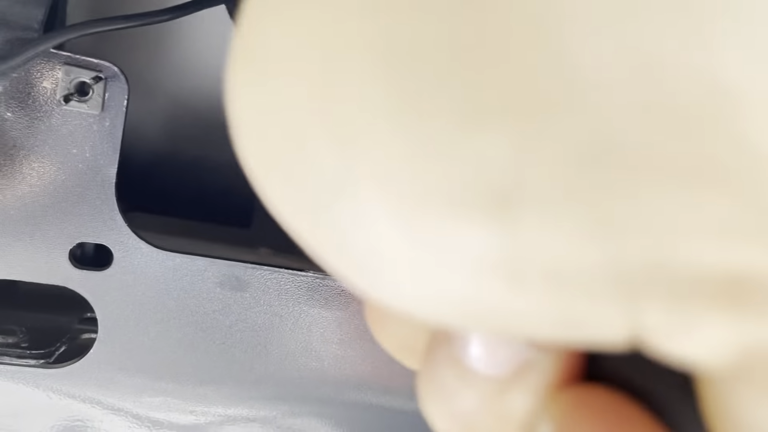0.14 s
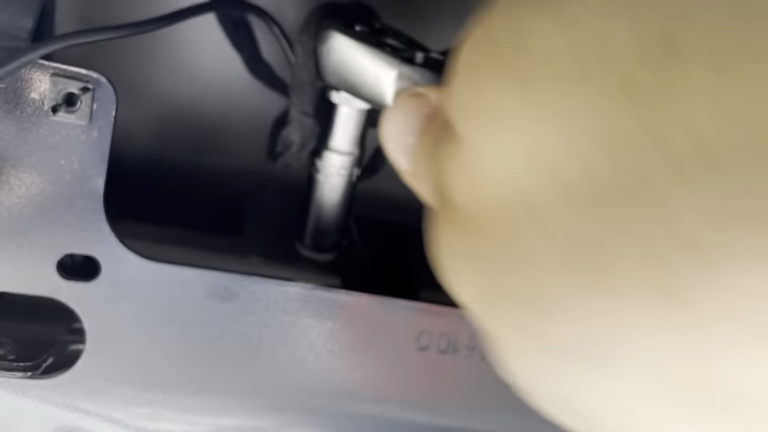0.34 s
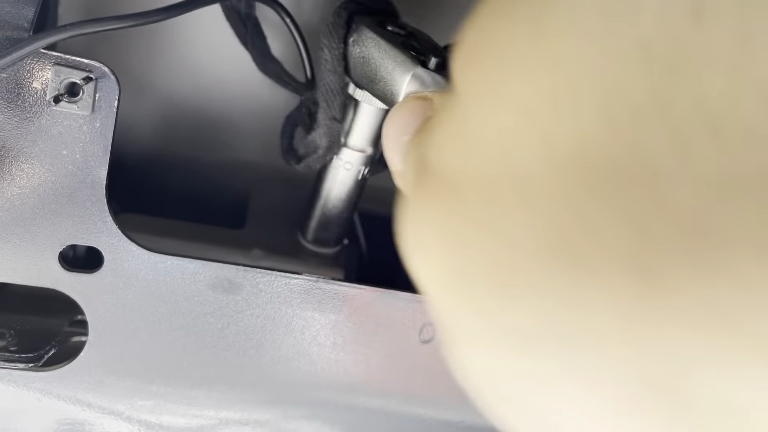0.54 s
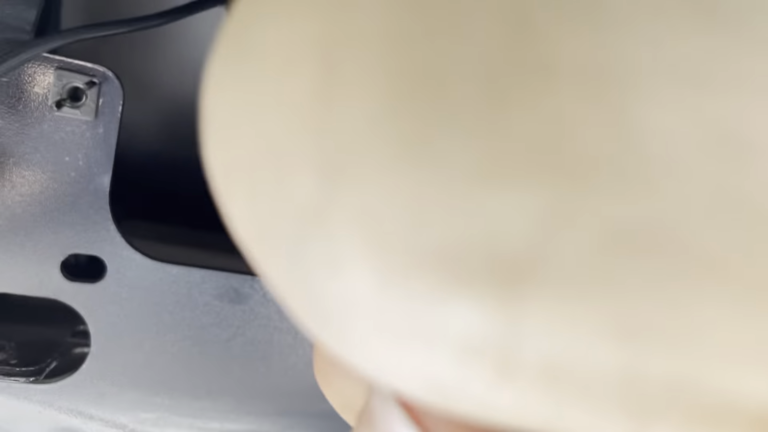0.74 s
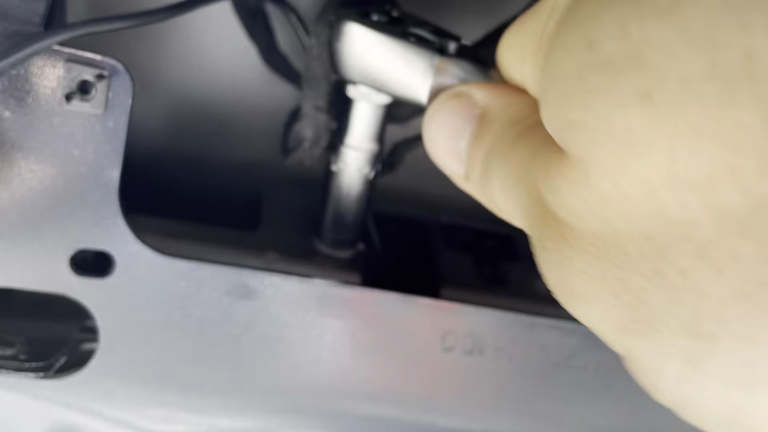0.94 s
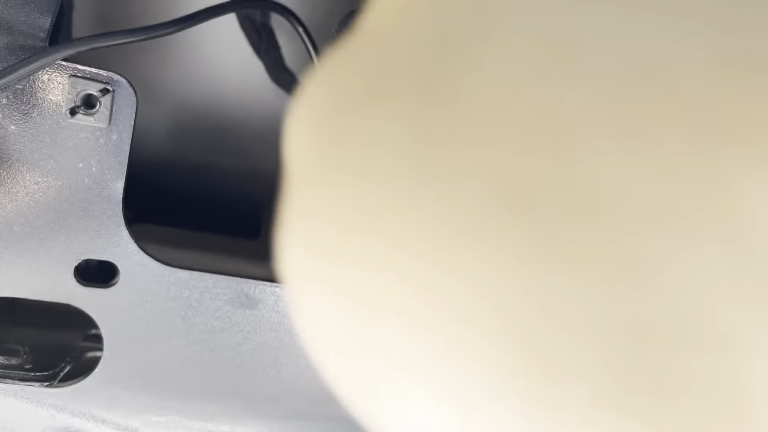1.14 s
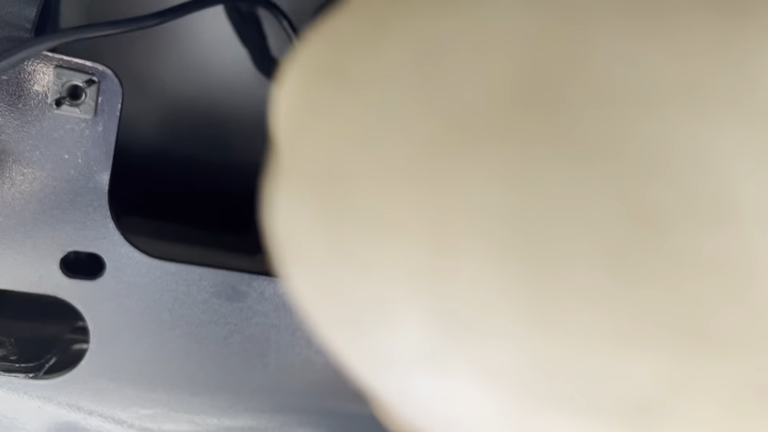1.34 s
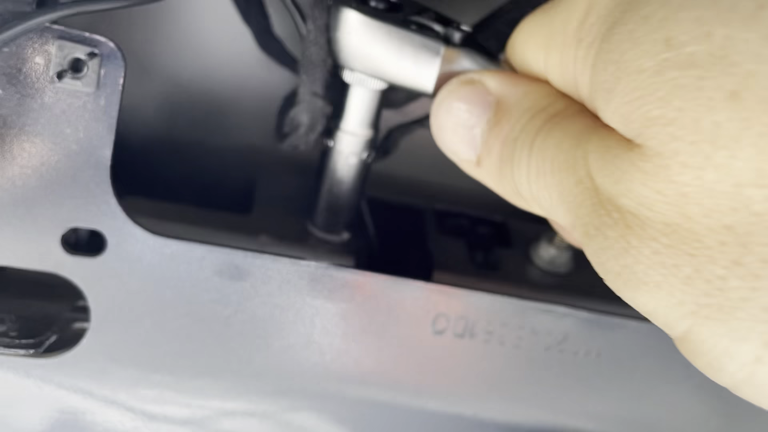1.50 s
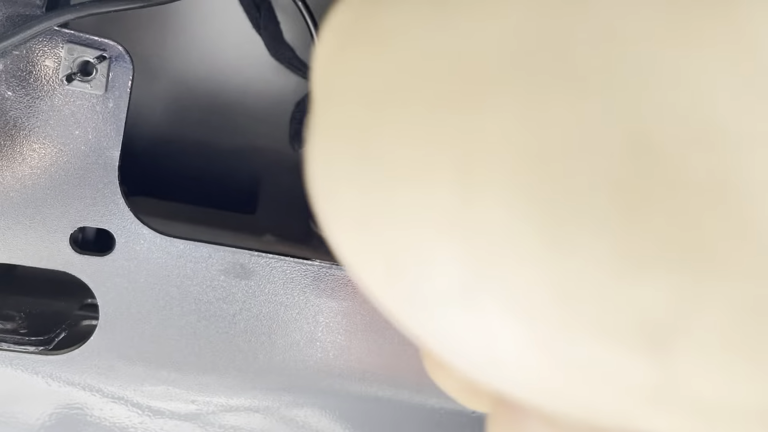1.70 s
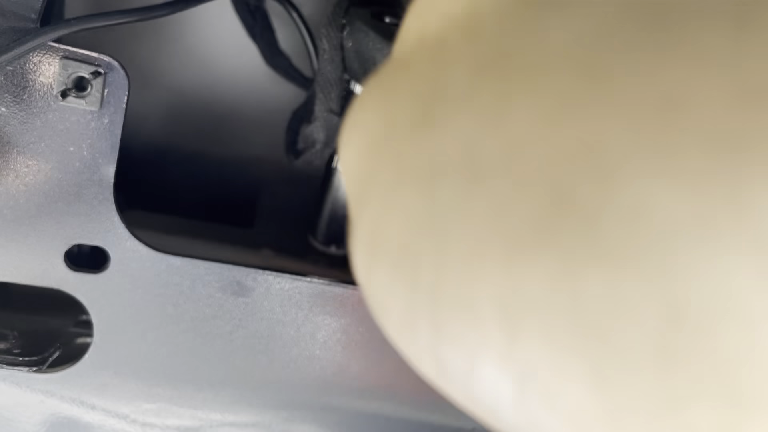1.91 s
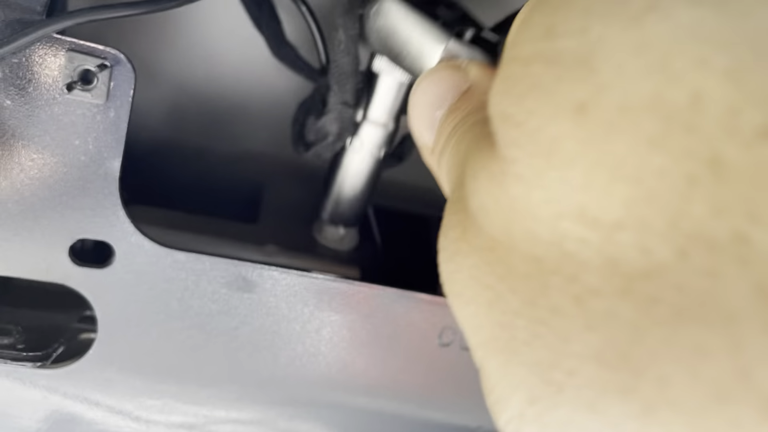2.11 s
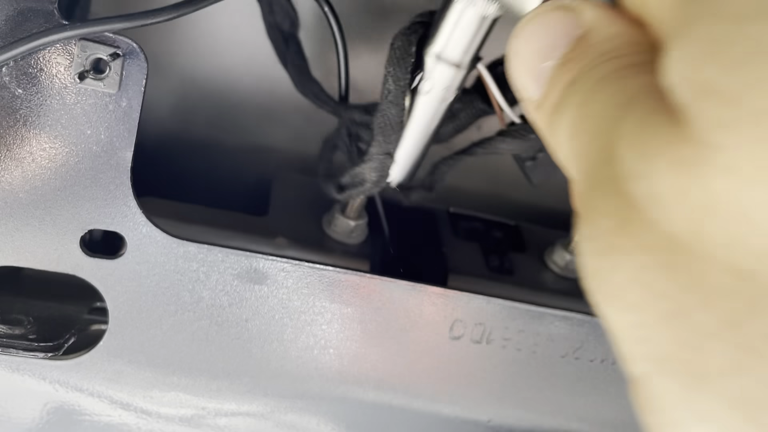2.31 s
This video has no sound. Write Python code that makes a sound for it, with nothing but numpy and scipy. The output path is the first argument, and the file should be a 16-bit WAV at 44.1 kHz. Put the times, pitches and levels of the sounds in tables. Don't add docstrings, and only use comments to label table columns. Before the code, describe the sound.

A ratchet wrench swings repeatedly, each stroke a dull hollow panel knock followed by a few fast steel clicks; lastly the socket scrapes off and clangs. Close stereo microphone, short door-cavity echoes, quiet garage.

```python
import sys
import numpy as np
from scipy import signal
from scipy.fft import rfft, irfft, next_fast_len
from scipy.io import wavfile
from scipy.ndimage import uniform_filter1d, map_coordinates

SR = 44100
rng = np.random.default_rng(int(sys.argv[2]) if len(sys.argv) > 2 else 0)


def to_wav(s):
    ch = np.atleast_2d(s).T
    pcm = np.round(np.clip(ch, -1, 1) * 32767)
    wavfile.write(sys.argv[1], SR, pcm.astype(np.int16))


def undo_db(level):
    steps = np.asarray(level, float) / 20
    return 10 ** steps


N = 103635

# [t/s, head chatter peak level/dB, steel ring level/dB]
PAWL_TEETH = [(0.2554, -16.5, -25), (0.269, -14.5, -24.5), (0.2843, -15, -24.5), (0.3007, -15, -25.5),
              (0.323, -25.5, -31.5), (0.3571, -24.5, -28.5), (0.7947, -21.5, -30.5), (0.8123, -22.5, -22.5),
              (0.8323, -25, -22.5), (0.8567, -23.5, -25.5), (0.8888, -29, -27), (1.3331, -20, -31),
              (1.3468, -30.5, -24), (1.3598, -24, -30.5), (1.3774, -25, -24), (1.4025, -26, -28),
              (1.4331, -24, -30), (1.9894, -27, -34.5)]
# [t/s, peak level/dB, share of the deep modes/dB, rattle level/dB]
PANEL_BLOWS = [(0.198, -18.5, -3.5, -31), (0.21, -10.5, -9, -28.5), (0.232, -22, -12, -41),
               (0.415, -21, -1, -37), (0.434, -16.5, 3.5, -27), (0.451, -16.5, -7, -68),
               (0.489, -32.5, 9.5, -65), (0.52, -23, 5, -41.5), (0.538, -25.5, 8, -55),
               (0.58, -30.5, -5, -56), (0.615, -35.5, 3, -67), (0.66, -40, 7, -68), (0.734, -3.5, -6, -22),
               (0.741, -12.5, -10.5, -52), (0.765, -17, -0.5, -43), (0.976, -26, 3, -42),
               (0.985, -31.5, 9.5, -37), (1.007, -13, -2.5, -37.5), (1.049, -32, 12, -47),
               (1.256, -18, 1, -38.5), (1.291, -9.5, -9, -44), (1.281, -6.5, -0.5, -26),
               (1.465, -27, 10, -31), (1.495, -11.5, 5.5, -36), (1.512, -11.5, -7, -36.5),
               (1.537, -13, 6.5, -44), (1.587, -18.5, 8.5, -38), (1.811, -17, -5, -29),
               (1.82, -3, -6.5, -27), (1.853, -14, -4, -36), (1.993, -18.5, -3.5, -42.5),
               (2.05, -15.5, -18, -26), (2.084, -21.5, -4, -29), (2.318, -53, 2.5, -39),
               (2.335, -28.5, -7, -46)]
# [f/Hz, level/dB, decay time T60/s]
PANEL_MODES = [(138.4, -9, 0.18), (205, -8.5, 0.17), (229.9, 0, 0.093), (384.8, 1.5, 0.065),
               (413.5, -8.5, 0.09), (519.4, -23.5, 0.12), (612, -22, 0.029), (746.5, -12, 0.048),
               (869, -22.5, 0.042), (1003, -22.5, 0.07), (1068, -26, 0.077), (1170, -26.5, 0.075),
               (1334, -23.5, 0.041)]


def unit(x):
    return x / np.sqrt(np.mean(x ** 2) + 1e-20)


def along(points, hz):
    f, value = np.transpose(points)
    return np.interp(np.log(hz + 1), np.log(f + 1), value)


def curves(rows):
    s, *columns = np.transpose(rows)
    return [np.interp(np.arange(N) / SR, s, column) for column in columns]


def wobble(rate):
    knots = rng.standard_normal(int(N * rate / SR) + 4)
    return map_coordinates(knots, [np.arange(N) * rate / SR])


def filtered(x, response):
    m = next_fast_len(x.shape[-1] + 8192)
    spectrum = rfft(x, m) * response(np.fft.rfftfreq(m, 1 / SR))
    return irfft(spectrum, m)[..., :x.shape[-1]]


def peak(f, hz, width):
    return 1j * f * width / (hz * hz - f * f + 1j * f * width)


def add(track, s, x):
    part = track[round(s * SR):][:len(x)]
    part += x[:len(part)]


def port_difference(f):
    loose_below_hz = 4500
    return undo_db(-5.5) + 1 / (1 + (f / loose_below_hz) ** 6)


def strokes(rows):
    fade_in_s, fade_t60 = 0.016, 0.1
    t = np.arange(N) / SR
    total = np.zeros(N)
    for s, length, db in rows:
        fade = undo_db(db - 60 * np.maximum(t - s - length, 0) / fade_t60)
        total += fade * np.clip((t - s) / fade_in_s, 0, 1) ** 2
    return total


def steel_colour(f):
    # [f/Hz, width/Hz, level/dB]
    steel_modes = [(2146, 37, 6), (2333, 43, 2), (2473, 130, 2.5), (2860, 100, 1), (3208, 61, 3.5),
                   (4360, 140, -13), (4920, 69, -18)]
    # [f/Hz, level/dB]
    broad_hump = [(600, -8), (1200, -6), (2000, -14.5), (3400, -14.5), (4200, -17), (7500, -24)]
    top_hz = 8000
    modes = sum(undo_db(db) * peak(f, hz, width) for hz, width, db in steel_modes)
    return (undo_db(along(broad_hump, f)) + abs(modes)) / (1 + (f / top_hz) ** 4)


def shared_noise(shape, loose_db):
    loose = filtered(rng.standard_normal((2, N)), port_difference)
    both = rng.standard_normal(N) + undo_db(loose_db) * loose
    return unit(filtered(both, lambda f: undo_db(along(shape, f))))


def garage_air():
    # [t/s, rumble level/dB, rustle level/dB, deep shudder level/dB]
    movement = [(0, -41.5, -64.5, -56), (.3, -41, -68.5, -70), (.5, -36.5, -65.5, -76),
                (.62, -36, -62, -62), (.85, -38.5, -81, -41), (1.25, -45.5, -65, -38.5),
                (1.5, -43.5, -62, -37), (1.7, -44.5, -64, -40), (2, -43, -67, -42.5),
                (2.2, -54.5, -56, -45)]
    # [f/Hz, density level/dB per Hz]
    rumble_shape = [(40, -25), (70, -7.5), (130, 2.5), (220, -4.5), (450, -18.5), (650, -44.5)]
    # [f/Hz, density level/dB per Hz]
    rustle_shape = [(300, -5.5), (700, 7.5), (1600, 3.5), (4500, 1), (8500, 2.5), (13000, 2), (16500, -10)]
    shudder_shape = [(20, -20), (55, 0), (120, -22), (200, -60)]  # f/Hz, level/dB
    rumble_db, rustle_db, shudder_db = curves(movement)
    rumble = undo_db(rumble_db + 4.96 * wobble(11.97)) * shared_noise(rumble_shape, -0.5)
    rustle_level = undo_db(rustle_db + 0.73 * wobble(14) + 2.3 * wobble(60))
    rustle = rustle_level * shared_noise(rustle_shape, 19.5)
    shudder = undo_db(shudder_db + 3 * wobble(15)) * shared_noise(shudder_shape, -3)
    return rumble + rustle + shudder


def far_hisses():
    # [f/Hz, width/Hz, level/dB, start t/s, end t/s]
    far_bands = [
        (1175, 30, -54, .92, 2.4),
        (5250, 120, -71, 1.05, 1.25),
        (4900, 100, -73, 1.07, 1.22),
        (6150, 70, -64, 1.05, 1.09),
        (5100, 200, -67, 1.595, 1.68),
        (4500, 500, -65, .57, .64),
        (4500, 200, -68, .1, .16),
    ]
    t, out = np.arange(N) / SR, np.zeros(N)
    for hz, width, db, start, end in far_bands:
        gate = np.clip(np.minimum(t - start, end - t) * 100, 0, 1) * undo_db(2 * wobble(25))
        hiss = unit(filtered(rng.standard_normal(N), lambda f: peak(f, hz, width) ** 2))
        out += undo_db(db) * gate * hiss
    return out


def panel_knocks():
    deep_hz, high_hz, blow_s = 300, 450, 0.003
    brightens = 0.64
    out, t = np.zeros(N), np.arange(SR // 5) / SR
    # t/s, level/dB, deep modes/dB, high modes/dB
    blows = [(s, db, deep_db, 0) for s, db, deep_db, _ in PANEL_BLOWS]
    blows += [(s, (head_db + steel_db) / 2 + 0.5, -7, 4) for s, head_db, steel_db in PAWL_TEETH]
    for s, db, deep_db, high_db in blows:
        ring = np.zeros(len(t))
        for hz, level, t60 in PANEL_MODES:
            level_shift, detune = rng.standard_normal(2)
            mode_db = level + level_shift
            if hz < deep_hz:
                mode_db += deep_db
            if hz > high_hz:
                mode_db += high_db + brightens * (db + 16)
            ring += undo_db(mode_db - 60 * t / t60) * np.sin(2 * np.pi * hz * (1 + 0.028 * detune) * t)
        add(out, s, undo_db(db - 1.5) * ring * (1 - np.exp(-(t / blow_s) ** 2)))
    return out


def rattle():
    # [f/Hz, level/dB]
    loose_parts = [(300, -19), (650, 2.5), (1200, 6), (3300, -11.5), (5000, -59), (8000, -19), (16000, -54)]
    rise_s, decay_t60 = 0.0044, 0.069
    t, shake = np.arange(N) / SR, np.zeros(N)
    for s, _, _, db in PANEL_BLOWS:
        rise = 1 - np.exp(-np.maximum(t - s, 0) / rise_s)
        shake += undo_db(db - 60 * abs(t - s) / decay_t60) * rise
    grains = rng.standard_normal(N) * undo_db(3.9 * np.clip(wobble(250), -2, 2))
    colour = lambda f: undo_db(along(loose_parts, f)) + undo_db(-6) * steel_colour(f)
    return shake * undo_db(2) * unit(filtered(grains, colour))


def rubbing():
    # [start t/s, length/s, level/dB]
    hand_drags = [
        (.2, .15, -30),
        (.4, 0.13, -37.5),
        (.74, 0.13, -36.5),
        (.97, 0.089, -33.5),
        (1.26, 0.27, -37),
        (1.46, .1, -32),
        (1.81, 0.13, -39.5),
        (1.99, 0.12, -33),
    ]

    def modes(f):
        total = 0
        for k, (hz, db, t60) in enumerate(PANEL_MODES):
            total = total + (-1) ** k * undo_db(db) * peak(f, hz, 2.62 / t60)
        return total

    friction = rng.standard_normal(N) * undo_db(2.9 * wobble(39.54))
    return strokes(hand_drags) * unit(filtered(friction, modes))


def contacts(rows, chatter_s, fizz_t60):
    # [f/Hz, level/dB]
    head_colour = [(3000, -8.5), (5000, -9), (8000, 8.5), (10500, 5.5), (13500, 0), (15500, -3),
                   (16600, -60)]
    steel_t60, tail_db, tail_t60 = 0.064, -13, 0.055
    upper_hz, upper_db, upper_t60 = 2850, 3, 0.028
    out, t = np.zeros(N), np.arange(SR // 6) / SR
    after = np.maximum(t - chatter_s, 0)
    lower_decay = undo_db(-60 * t / steel_t60)
    upper_decay = undo_db(upper_db - 60 * t / upper_t60) + undo_db(-7.5 - 60 * t / steel_t60)
    fizz_decay = undo_db(-60 * after / fizz_t60) + undo_db(tail_db - 60 * t / tail_t60)
    for s, head_db, steel_db in rows:
        steel_noise, head_noise, grain = rng.standard_normal((3, len(t)))
        whole = unit(filtered(steel_noise, steel_colour))
        upper = filtered(whole, lambda f: 1 / (1 + (upper_hz / (f + 1)) ** 8))
        ring = (whole - upper) * lower_decay + upper * upper_decay
        ring = ring * (1 - np.exp(-t / 0.00065))
        spiky = undo_db(3.5 * uniform_filter1d(grain, size=12) * np.sqrt(12))
        fizz = unit(filtered(head_noise, lambda f: undo_db(along(head_colour, f))) * spiky)
        fizz = fizz * fizz_decay * (1 - np.exp(-t / 0.000072))
        add(out, s, undo_db(steel_db + 1.0) * ring + undo_db(head_db - 4.5) * fizz)
    return out


def pawl():
    return contacts(PAWL_TEETH, chatter_s=0.0021, fizz_t60=0.015)


def tool_ticks():
    # [t/s, head fizz peak level/dB, steel ring level/dB]
    loose_ticks = [(0.408, -46, -46), (0.4323, -32, -36), (0.4514, -34, -56), (0.475, -42, -63),
                   (0.5505, -40, -53.5), (0.7331, -33, -27), (0.9863, -40.5, -45.5), (1.003, -48, -38),
                   (1.037, -32, -40.5), (1.1702, -42.5, -68), (1.225, -52, -67), (1.281, -40, -40.5),
                   (1.4935, -34, -33), (1.504, -44, -39), (1.5115, -45, -32.5), (1.538, -34, -48.5),
                   (1.585, -52, -54), (1.7388, -36, -54.5), (1.8211, -32, -28.5), (1.906, -40.5, -64),
                   (1.925, -42, -56), (1.9545, -36.5, -65), (2.0667, -15.5, -22.5), (2.0703, -31, -23),
                   (2.0835, -30, -25.5), (2.1134, -37.5, -41.5), (2.3276, -57, -41), (2.3354, -47, -59)]
    return contacts(loose_ticks, chatter_s=0.00032, fizz_t60=0.0041)


def bumps():
    # [t/s, peak level/dB, f/Hz]
    arm_bumps = [
        (0.9, -22.5, 66),
        (1.016, -24.5, 63),
        (1.141, -22, 71),
        (1.189, -25.5, 63.3),
        (1.23, -15.5, 70),
        (1.379, -22.5, 68.5),
        (1.418, -22.5, 63.6),
        (1.467, -16.5, 64),
    ]
    out, t = np.zeros(N), np.arange(SR // 5) / SR
    for s, db, hz in arm_bumps:
        cycles = t * hz / 1.01
        swell = cycles * np.exp(-cycles * 2.28)
        add(out, s, undo_db(db + 16.5) * swell * np.sin(2 * np.pi * hz * t))
    return out


def scrape():
    # [start t/s, length/s, level/dB]
    grinds = [
        (2.024, 0.0125, -26),
        (2.036, .012, -24),
        (2.064, 0.013, -28.5),
    ]
    grit = rng.standard_normal(N) * undo_db(4.6 * np.clip(wobble(500), -1.5, 1.5))
    colour = lambda f: steel_colour(f) * (undo_db(-3.5) + peak(f, 1570, 1200))
    return strokes(grinds) * unit(filtered(grit, colour))


def clang():
    # [t/s, level/dB]
    strikes = [
        (2.0669, -11),
        (2.0705, -12),
        (2.0822, -23.5),
    ]
    # [f/Hz, level/dB, decay time T60/s]
    socket_modes = [(1906, -10, 0.024), (2100, -11, .04), (2496, -8.5, 0.038), (2860, -7.5, 0.016),
                    (3204, 4, 0.023), (3460, -4, 0.023), (4600, -12.5, 0.025), (5275, -10, .025),
                    (6560, -17.5, 0.042), (7580, -4.5, 0.027)]
    out, t = np.zeros(N), np.arange(SR // 8) / SR
    for s, db in strikes:
        ring = np.zeros(len(t))
        for hz, level, t60 in socket_modes:
            level_shift, detune = rng.standard_normal(2)
            decay = undo_db(level + 2 * level_shift - 60 * t / t60)
            ring += decay * np.sin(2 * np.pi * hz * (1 + 0.013 * detune) * t)
        add(out, s, undo_db(db) * (1 - np.exp(-t / 0.00047)) * ring)
    return out


def cavity(x):
    shift_s, echo_t60 = 0.1, 0.07
    t, hop = np.arange(SR // 5) / SR, round(shift_s * SR)
    out = np.zeros((2, N + SR))
    padded = np.pad(x, (hop, 2 * hop))
    for start in range(0, N, hop):
        tail = rng.standard_normal((2, len(t))) * undo_db(-60 * t / echo_t60)
        tail = tail * (1 - np.exp(-t / 0.00082))
        piece = padded[start:start + 2 * hop] * np.hanning(2 * hop)
        echo = signal.fftconvolve(piece[None], tail / np.linalg.norm(tail[0]), axes=1)
        out[:, start:start + echo.shape[1]] += echo
    return filtered(out[:, hop:hop + N], port_difference)


def scene():
    near = panel_knocks() + rattle() + rubbing() + pawl() + tool_ticks() + scrape() + clang()
    return garage_air() + far_hisses() + near + bumps() + undo_db(-8) * cavity(near)


def low_pass(x):
    return signal.sosfilt(signal.butter(12, 16810, fs=SR, output="sos"), x)


def record(dry):
    # [f/Hz, phase/rad]
    phase_lead = [(60, 0), (450, .5), (1200, 3.1), (2300, 6.2), (3200, 7.3), (5000, 7), (7700, 3.5),
                  (9600, 2.8), (12500, .05)]
    # [f/Hz, level/dB]
    left_over_right = [(100, .3), (400, 2), (900, 7), (1800, 0), (3500, 4.5), (6000, 1.5), (7700, 0)]
    top_hz, low_cut_hz = 16600, 40
    side = np.array([[0.5], [-0.5]])

    def ports(f):
        level = undo_db(side * along(left_over_right, f))
        phase = np.exp(1j * side * along(phase_lead, f))
        band = (f < top_hz) * f ** 2 / (f ** 2 + low_cut_hz ** 2)
        return level * phase * band

    return low_pass(filtered(dry, ports))


dry = scene()
out = record(dry)
to_wav(out)
```